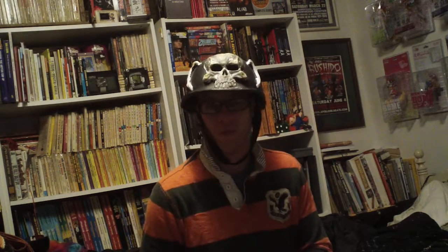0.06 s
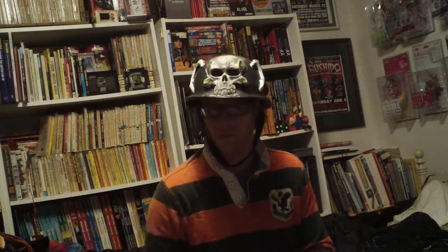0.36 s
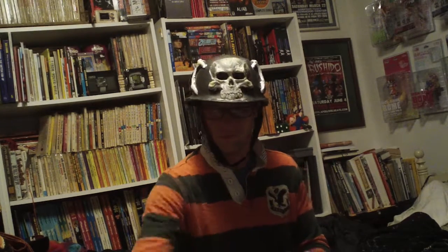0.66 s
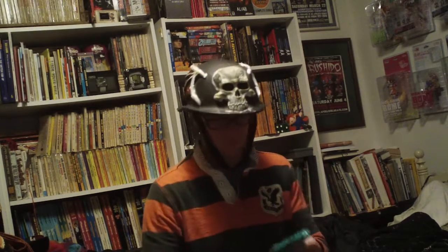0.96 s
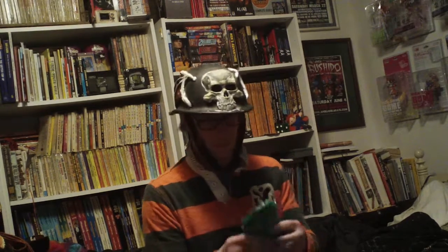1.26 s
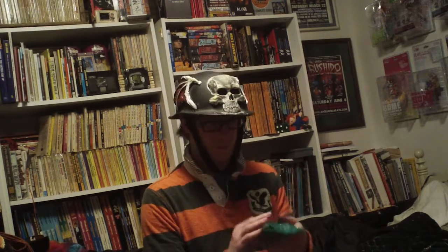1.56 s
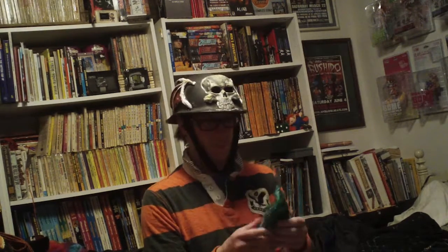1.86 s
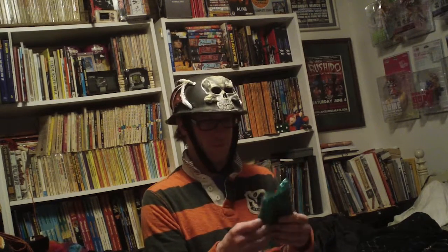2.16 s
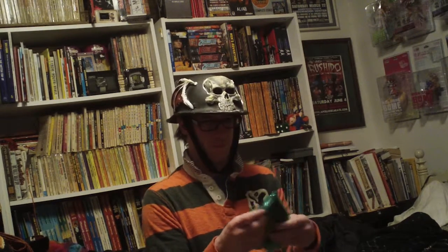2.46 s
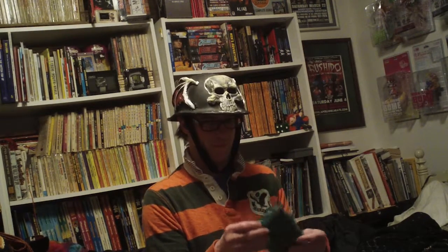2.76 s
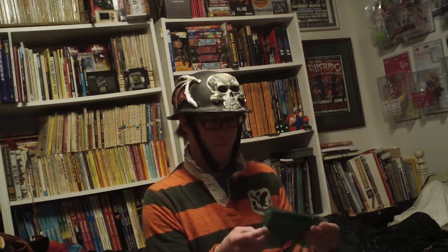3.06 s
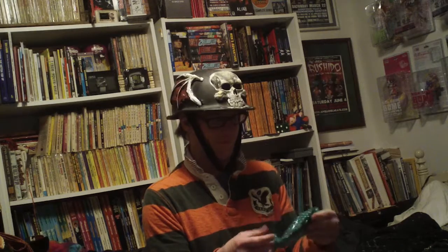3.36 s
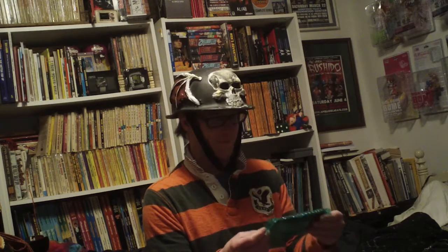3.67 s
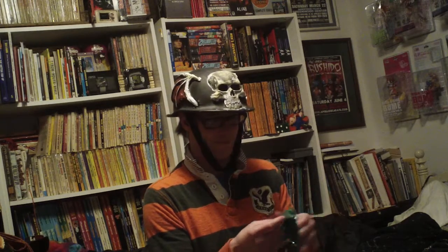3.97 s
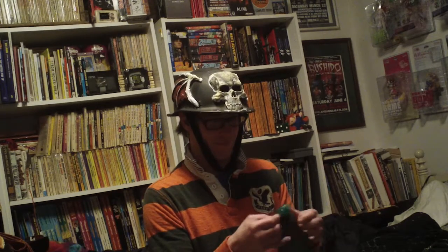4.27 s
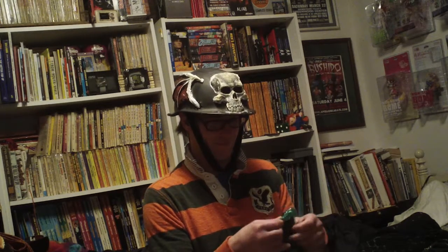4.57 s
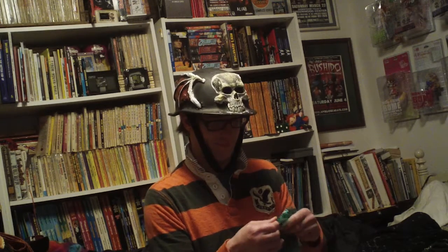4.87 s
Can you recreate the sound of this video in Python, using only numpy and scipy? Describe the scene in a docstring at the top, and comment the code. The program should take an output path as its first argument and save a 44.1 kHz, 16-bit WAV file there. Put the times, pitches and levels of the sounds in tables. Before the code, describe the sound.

In a quiet small room, close to the microphone, a brief clatter rings on a desk as a plastic package is picked up. A dull little pat in the hand follows, then soft, uneven rustling and scattered ticks as fingers handle the wrapper. Finally the fingers slip and pluck at the taut plastic in a cluster of crisp clicks. Light hiss and a low rumble lie underneath.

```python
"""A desk in a quiet room, the microphone close by. A small soft plastic package is snatched up with
one short clatter: a cluster of contacts, and a heavy blow that sets the desk ringing. The package thuds
into the palm, and fingers turn it over, rubbing the wrapper in tiny stick-slip releases while its
creases tick. At last they pull harder, slipping and plucking the taut plastic.
A low room rumble and the hiss of the microphone lie underneath."""
import sys
import numpy as np
from scipy import signal
from scipy.fft import rfft, irfft
from scipy.io import wavfile

SR = 44100
rng = np.random.default_rng(int(sys.argv[2]) if len(sys.argv) > 2 else 0)


def wrap_up_sound(samples):
    """Save the sound to the file named by the first command line argument, as 16-bit audio."""
    columns = np.atleast_2d(samples).T
    # keep every value between -1 and 1, then stretch to whole-number steps
    tamed = np.clip(columns, -1, 1)
    steps = np.round(tamed * 32767).astype(np.int16)
    wavfile.write(sys.argv[1], SR, steps)


N = 225504

# The package knocks on the desk and rebounds, close by. Each row: start in seconds, strength in dB.
CONTACTS = [(0.8301, -14.5), (0.839, -12.5), (0.8426, -8), (0.8455, -4.5), (0.851, -8.5), (0.854, -2.5),
            (0.862, -1.5), (0.8709, -8.5), (0.8751, -12), (0.884, -22), (0.9385, -30), (0.949, -20),
            (0.957, -28.5), (0.965, -32)]
# The desk and the things on it. Each row: frequency in Hz, relative level in dB, t60 in seconds.
DESK_MODES = [(118, -25, .17), (205, -16, .085), (280, -22, .085), (365, -19, .08), (427, -22, .065),
              (490, -18, .07), (558, -13.5, .11), (612, -16.5, .07), (680, -19, .075), (935, -17.5, .11),
              (1010, -14.5, .07), (1055, -17.5, .08), (1170, -17, .115), (1258, -12.5, .065),
              (1394, -12, .055), (1480, -18, .065), (1590, -23, .09), (1824, -21, .07), (2210, -25, .085),
              (2340, -24, .07), (2530, -21, .09), (2815, -19, .085), (3074, -26, .08)]
# The dense clatter of one contact. Each row: frequency in Hz, relative level in dB.
CLATTER_SPECTRUM = [(25, -28), (60, -8), (130, -11), (300, -3), (560, 0.5), (800, -2.5), (1000, 8.5),
                    (1400, 1), (1900, -3), (2700, -3), (3600, -8), (7000, -16.5), (9500, -13), (13000, -10),
                    (16000, -19)]
# Contacts harden as the package is squeezed flat. Each row: time in seconds, treble cut-off in Hz.
HARDENING = [(0.835, 2400), (0.855, 9900)]


def desk_clatter(clatter_db=-7.5, clatter_t60=0.066, crack_db=-2, crack_t60=0.0108, stir_db=-18):
    """Each contact cracks, clatters and stirs the desk's modes; one heavy blow sets them ringing."""
    t, out = np.arange(SR // 4) / SR, np.zeros(N)
    ring = ringing(DESK_MODES, t, rise_s=0.0046)
    add(out, 0.849, amp(-0.7) * ring)  # the package's full weight meets the desk
    yielding = 1 - np.exp(-t / 0.0005)
    fade = yielding * (amp(-60 * t / clatter_t60) + amp(crack_db - 60 * t / crack_t60))
    for start_s, db in CONTACTS:
        clatter = colour(fade * rng.standard_normal(len(t)), CLATTER_SPECTRUM)
        contact = amp(clatter_db) * clatter + amp(stir_db) * ring
        cutoff_hz = np.interp(start_s, *np.transpose(HARDENING))  # a softer contact loses its treble
        add(out, start_s, amp(db) * signal.lfilter(*signal.butter(1, cutoff_hz, fs=SR), contact))
    return out


# Long rubs near the microphone: reaching, turning the package over, then pulling at it.
# Each row: start in seconds, length in seconds, pressure in dB, sliding in dB.
RUBS = [(0.055, 0.29, -57, -64), (0.945, 0.123, -54, -67), (1.342, 0.13, -51, -62),
        (1.557, 0.517, -53.5, -75), (2.792, 0.134, -55, -53), (3.016, 0.104, -52, -53),
        (3.27, 0.34, -54.5, -57), (4.219, 0.15, -52, -52), (4.49, 0.3386, -51, -58.5),
        (4.887, 0.16, -50.5, -49), (4.946, 0.049, -44.5, -41.5), (5.071, .06, -45, -42)]
# Quick dabs of a fingertip. Each row: middle in seconds, pressure in dB.
DABS = [(1.4, -49), (1.657, -48), (1.735, -48.5), (1.865, -46.5), (2.17, -44.5), (2.245, -46.5),
        (2.312, -48.5), (2.59, -48), (3.105, -48), (3.17, -53), (3.483, -51), (3.774, -46.5), (3.853, -49),
        (4.325, -50), (4.663, -47.5), (4.757, -44.5)]


def finger_effort(rise_s=0.0074, release_s=0.017, regrip_s=0.037, dab_s=0.035, fidget_db=0.65):
    """Pressure and sliding of the fingers: a restless hold, long rubs and quick dabs add in power."""
    t = np.arange(N) / SR
    hold = np.clip((t - 1.29) / rise_s, 0, 1) * amp(fidget_db * drift(per_s=16))
    for let_go_s in (2.43, 3.21, 3.73, 4.41):  # the fingers change their grip
        hold *= 1 - np.exp(-(2 * (t - let_go_s) / regrip_s) ** 2)
    power = (amp([[-55.5], [-60.5]]) * hold) ** 2  # pressure, sliding
    for start_s, length_s, pressure_db, sliding_db in RUBS:
        rise = np.clip((t - start_s) / rise_s, 0, 1)
        release = np.exp(-np.clip((t - start_s - length_s) / release_s, 0, 20))
        power += (amp([[pressure_db], [sliding_db]]) * rise * release) ** 2
    for middle_s, db in DABS:
        near = abs(t - middle_s) < dab_s
        swell = np.exp(-(2 * (t[near] - middle_s) / dab_s) ** 2)
        power[:, near] += (amp([[db], [db - 10.5]]) * swell) ** 2  # a dab slides little
    return np.sqrt(power)


# The package in the hands. Each row: resonance in Hz, width of one filter pass in Hz, level in dB.
PACKAGE_RESONANCES = [(999.6, 460, -0.5), (1205, 285, 0.5), (1330, 370, -1), (2824.5, 690, -7.5)]
# The scuff of pressing fingers. Each row: frequency in Hz, relative level in dB.
SCUFF_SPECTRUM = [(60, -18.5), (200, 2), (500, 3.5), (800, -1.5), (1600, 3.5), (2200, -11.5), (4000, -6.5),
                  (9000, -10.5)]
# The bright fizz of sliding on the wrapper. Each row: frequency in Hz, relative level in dB.
FIZZ_SPECTRUM = [(800, -41), (2000, 5), (3200, 2), (5000, 5), (7000, 3), (10000, 5), (13000, 6),
                 (16000, -5)]


def rubbing(body_db=-1.68, scuff_db=-6, fizz_db=-1.6, catch_db=1.26):
    """Friction sounds the package under the fingers; the surface itself fizzes."""
    grip = unit(amp(catch_db * drift(per_s=110)))  # the skin catches unevenly
    pressure, sliding = finger_effort() * grip
    drive = friction(grains_per_s=1400, spread_db=3.0, smooth=0.587)
    body = np.zeros(N)
    for k, (hz, width, db) in enumerate(PACKAGE_RESONANCES):
        shifted = np.roll(drive, k * SR)  # keeps the resonances unrelated
        body += amp(db) * resonate(resonate(shifted, hz, width), hz, width)
    scuff = colour(drive, SCUFF_SPECTRUM)
    fizz = colour(friction(grains_per_s=4000, spread_db=4.0, smooth=0.99), FIZZ_SPECTRUM)
    pressed = amp(body_db) * unit(body) + amp(scuff_db) * unit(scuff)
    return pressure * pressed + sliding * amp(fizz_db) * unit(fizz)


def friction(grains_per_s, spread_db, smooth):
    """Tiny stick-slip releases of uneven size over a smooth sliding noise."""
    size = amp(spread_db * np.minimum(rng.exponential(1, N), 4)) * rng.choice([-1, 1], N)
    releases = size * (rng.random(N) < grains_per_s / SR)
    return unit(unit(releases) + smooth * rng.standard_normal(N))


# Fingers slip on the wrapper, mostly in the last pull. Each row: start in seconds, strength in dB.
SLIPS = [(0.948, -27.5), (1.41, -33.5), (4.932, -38), (4.961, -32), (4.976, -28.5), (4.987, -28.5),
         (4.9955, -31), (5.011, -26), (5.015, -28), (5.0263, -35), (5.104, -32)]


def slips(base_hz=1350, base_db=-27.5, tighten_hz_per_db=11.5, t60=0.021, octave_db=-16):
    """Each slip plucks the taut wrapper; a harder pull tightens it, so it rings higher."""
    t, out = np.arange(SR // 10) / SR, np.zeros(N)
    for start_s, db in SLIPS:
        hz = base_hz + tighten_hz_per_db * (db - base_db)
        modes = [(hz, db, t60), (2 * hz, db + octave_db, t60)]
        add(out, start_s, 2 * ringing(modes, t, rise_s=0.0014))
    return out


# Creases snap, heard from close up. Each row: start in seconds, level in dB, centre in Hz.
CREASES = [(0.2185, -41, 11000), (0.256, -52.5, 2800), (1.3394, -44.5, 11100), (2.148, -40, 11500),
           (3.345, -49, 2730), (3.465, -50.5, 2600), (4.5634, -42, 7030), (4.591, -37, 12000),
           (4.954, -34, 9550), (5.006, -37.5, 7200), (5.014, -33, 10000), (5.083, -43.5, 7540)]


def crease_ticks(sharpness=2.9, rise_s=0.0018, t60_cycles=420):
    """Each snap is a puff in a broad resonance, dying away in the same number of cycles."""
    t, out = np.arange(SR // 5) / SR, np.zeros(N)
    for start_s, db, hz in CREASES:
        puff = unit(resonate(rng.standard_normal(len(t)), hz, hz / sharpness))
        envelope = amp(db - 60 * t * hz / t60_cycles) * (1 - np.exp(-t / rise_s))
        add(out, start_s, envelope * puff)
    return out


# The package against the palm. Each row: frequency in Hz, level in dB, t60 in seconds.
THUD_MODES = [(168, -42, 0.027), (255, -32, 0.035), (383, -36, 0.0344), (515, -34.5, 0.034),
              (733, -39, .02), (1560, -35, 0.03)]


def palm_thud(start_s=1.4085):
    """The soft package lands in the palm with a dull, quickly damped ring."""
    out = np.zeros(N)
    add(out, start_s, ringing(THUD_MODES, np.arange(SR // 8) / SR, rise_s=0.0006))
    return out


def faint_tone(start_s, length_s, hz, db):
    """A brief, nearly pure note that swells and fades."""
    t, out = np.arange(round(length_s * SR)) / SR, np.zeros(N)
    add(out, start_s, amp(db) * np.sin(np.pi * t / length_s) * np.sin(2 * np.pi * hz * t))
    return out


# The room around the desk. Each row: frequency in Hz, t60 in seconds.
ROOM_DECAY = [(100, 0.313), (500, 0.16), (1200, 0.219), (3000, 0.27), (8000, 0.35), (15000, 0.093)]


def room(x, wet_db, gap_s=0.0042):
    """A small room full of books: a short diffuse tail, each band dying at its own speed."""
    hz, t, bands = signal.stft(rng.standard_normal(SR // 2), SR, nperseg=256)
    decay = amp(-60 * t / read(ROOM_DECAY, hz)[:, None])
    tail = signal.istft(bands * decay, SR, nperseg=256)[1]
    tail *= np.arange(len(tail)) > gap_s * SR
    return x + amp(wet_db) * signal.fftconvolve(x, tail / np.linalg.norm(tail))[:N]


# The noise floor at the microphone. Each row: frequency in Hz, relative level in dB.
HISS_SPECTRUM = [(15, -95), (25, -25.5), (98, 2), (128, -4), (365, -5.5), (407, -7), (518, -6), (608, -6.5),
                 (774, -7.5), (1100, -7.5), (1190, -10.5), (6980, -17.5), (7770, -12), (8650, -18.5),
                 (15200, -19)]


def background(hiss_db=-51, rumble_hz=94, width_hz=50, rumble_db=-68):
    """Microphone hiss and a low drone in the room."""
    hiss = colour(rng.standard_normal(N), HISS_SPECTRUM)
    rumble = resonate(resonate(rng.standard_normal(N), rumble_hz, width_hz), rumble_hz, width_hz)
    return amp(hiss_db) * unit(hiss) + amp(rumble_db) * unit(rumble)


def ringing(modes, t, rise_s):
    """Damped modes in unrelated phases, swelling as the body takes up the blow."""
    phases = rng.uniform(0, 2 * np.pi, len(modes))
    ring = sum(amp(db - 60 * t / t60) * np.sin(2 * np.pi * hz * t + phase)
               for (hz, db, t60), phase in zip(modes, phases))
    return ring * (1 - np.exp(-t / rise_s))


def resonate(x, hz, width):
    """One resonance of gain 1."""
    return signal.lfilter(*signal.iirpeak(hz, hz / width, SR), x)


def colour(x, spectrum, size=4096):
    """Causal filter with the given spectrum, so that attacks stay sharp."""
    log_gain = np.log(amp(read(spectrum, abs(np.fft.fftfreq(size, 1 / SR)))))
    taps = np.fft.ifft(np.exp(np.conj(signal.hilbert(log_gain)))).real
    return signal.fftconvolve(x, taps)[:len(x)]


def drift(per_s):
    """Smooth random wandering of rms 1."""
    knots = rng.standard_normal(N // 16)
    return unit(np.interp(np.arange(N) * per_s / SR, np.arange(len(knots)), knots))


def read(points, hz):
    """Reads a table on a log-frequency axis."""
    table_hz, value = np.transpose(points)
    return np.interp(np.log(hz + 1), np.log(table_hz + 1), value)


def add(mix, start_s, sound):
    """Adds a sound into the mix at the given time."""
    part = mix[round(start_s * SR):][:len(sound)]
    part += sound[:len(part)]


def amp(db):
    """Decibels to gain."""
    return 10 ** (np.asarray(db) / 20)


def unit(x):
    """Scales to rms 1."""
    return x / np.sqrt(np.mean(x ** 2) + 1e-20)


def scene():
    """The desk and the hands close to one microphone, with a little room, over the background."""
    squeak = faint_tone(start_s=0.203, length_s=0.024, hz=11350, db=-46)
    low_note = faint_tone(start_s=1.79, length_s=0.18, hz=214, db=-54.5)
    hands = rubbing() + slips() + crease_ticks() + palm_thud() + squeak + low_note
    return (room(desk_clatter(), wet_db=-14) + room(hands, wet_db=-10) + background())[None]


# Narrow dips in the microphone's treble. Each row: centre in Hz, width in Hz, gain in dB.
MICROPHONE_DIPS = [(7750, 155, -4), (7897, 368, -20.5), (10960, 340, -6.5)]


def record(dry):
    """The microphone's narrow treble dips, then the band limit."""
    hz = np.fft.rfftfreq(2 * N, 1 / SR)
    dips_db = sum(db * np.exp(-((hz - centre) / width) ** 2) for centre, width, db in MICROPHONE_DIPS)
    heard = irfft(rfft(dry, 2 * N) * amp(dips_db))[:, :N]
    band_limit = signal.firwin(511, cutoff=15400, window=("kaiser", 9), fs=SR)
    return signal.oaconvolve(heard, band_limit[None], "same")


dry = scene()
out = record(dry)
wrap_up_sound(out)
```